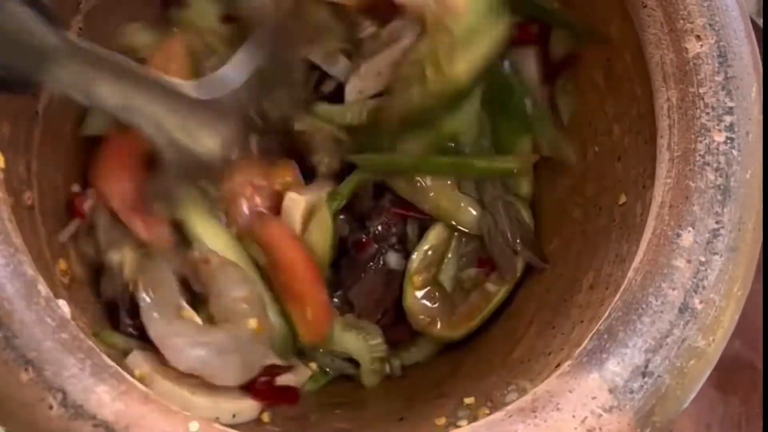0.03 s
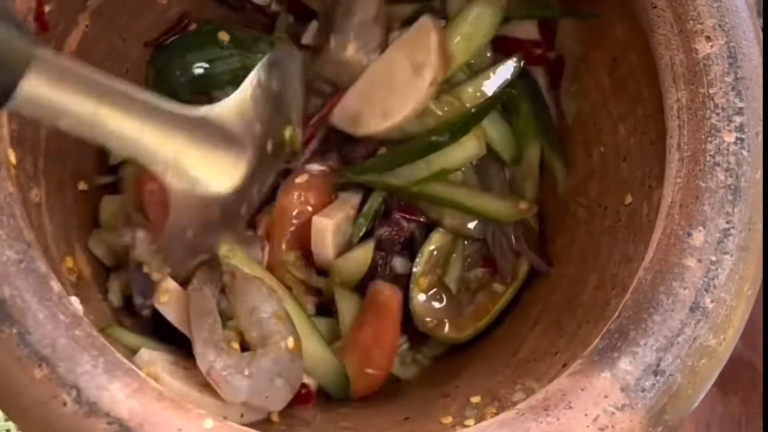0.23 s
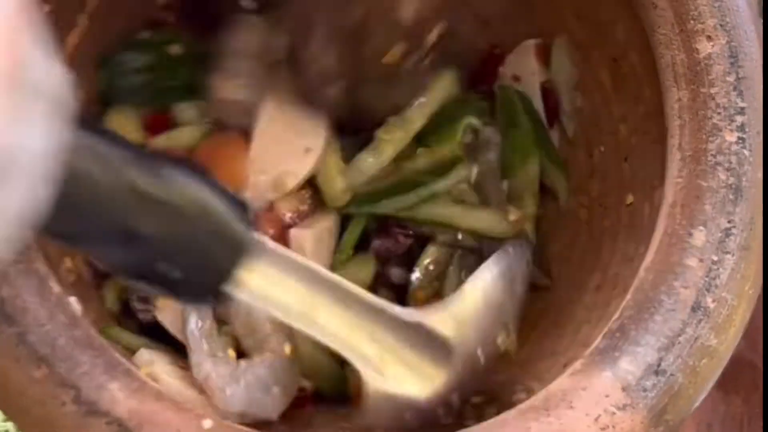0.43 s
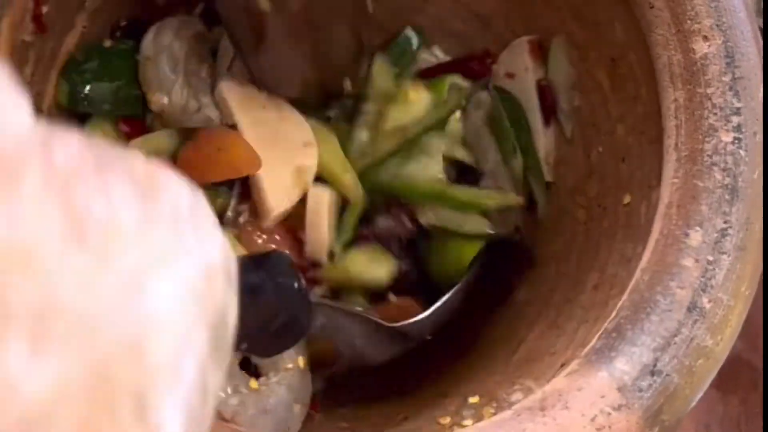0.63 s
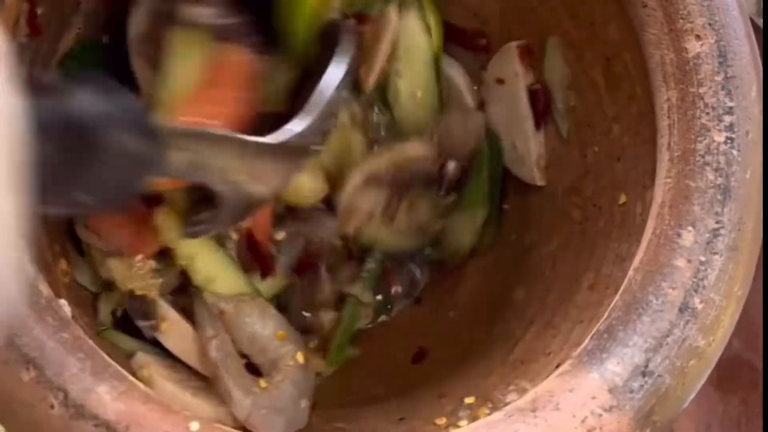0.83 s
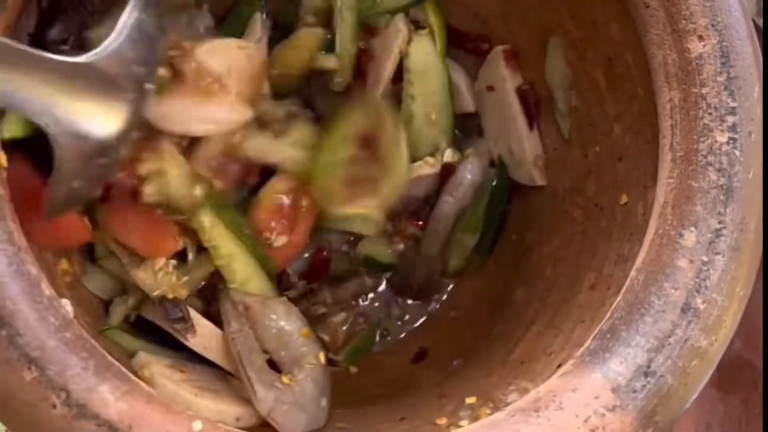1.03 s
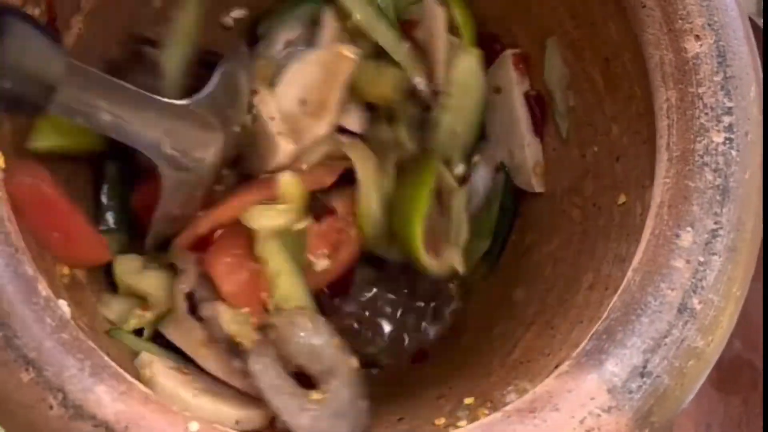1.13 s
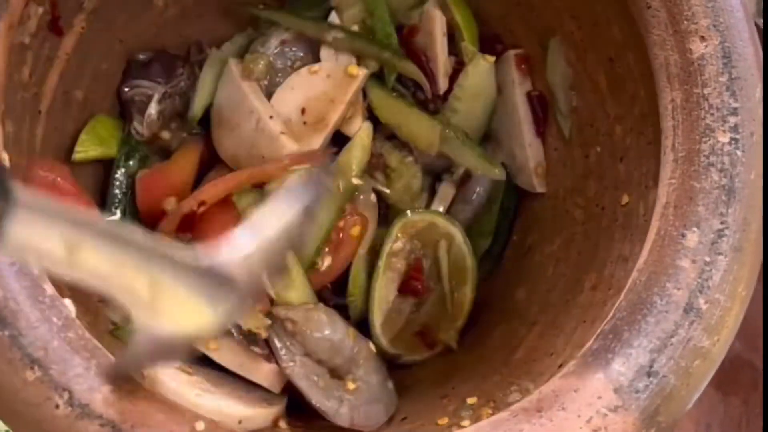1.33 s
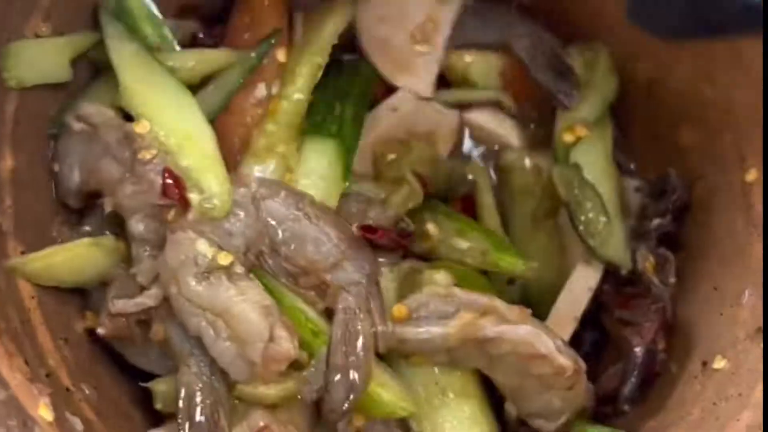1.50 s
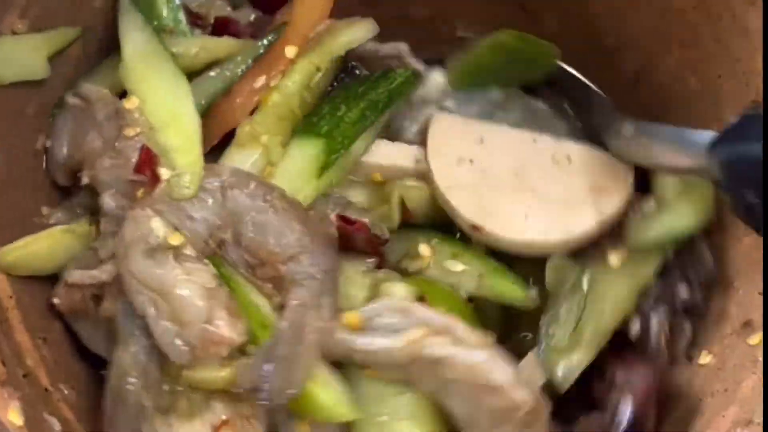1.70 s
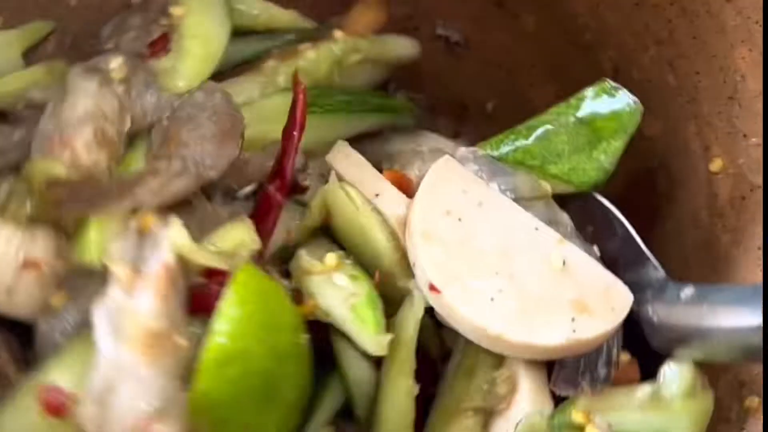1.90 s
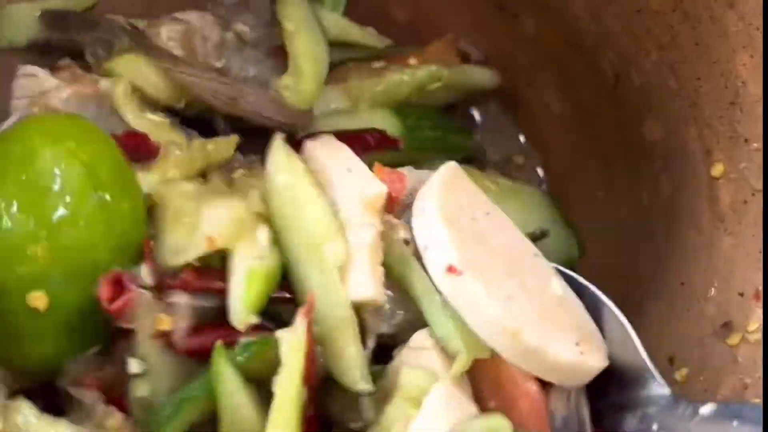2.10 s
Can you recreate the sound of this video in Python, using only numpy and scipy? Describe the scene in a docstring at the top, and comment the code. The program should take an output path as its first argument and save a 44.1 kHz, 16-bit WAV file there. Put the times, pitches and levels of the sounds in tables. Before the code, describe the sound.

A metal spoon turns wet salad in a clay mortar, close to the microphone. It scrapes and clinks against the wall amid small squelches and pops, then continues more quietly after a brief dip. A faint motor hums in the kitchen.

```python
"""Salad in a clay mortar

Close to the microphone, in a kitchen, a metal spoon turns a wet salad. It clinks against the clay
wall and scrapes along it, ringing the modes of both; wet pieces squelch, tick, crackle and plop.
Behind it a motor hums, with room noise and a low rumble. Near 1.5 s the sound fades out for a
moment and returns, quieter and from another position."""
import sys
import numpy as np
from scipy import signal
from scipy.fft import rfft, irfft
from scipy.io import wavfile

SR = 44100
rng = np.random.default_rng(int(sys.argv[2]) if len(sys.argv) > 2 else 0)


def inscribe(sig):
    """Save sig as 16-bit PCM at rate SR to the path in sys.argv[1].

    A 1-D sig is mono; a 2-D sig holds one channel per row.
    Samples are clipped to [-1, 1] before scaling.
    """
    pcm = np.round(np.clip(np.atleast_2d(sig).T, -1, 1) * 32767)
    wavfile.write(sys.argv[1], SR, pcm.astype(np.int16))


N = 94815
TIME = np.arange(N) / SR
BREAK_S = 1.478  # the position changes here, inside the fade
BEFORE = TIME < BREAK_S

# modes of spoon and mortar: f/Hz, t60/s, relative level/dB when struck at spot A, B, C
MODES = [(541, 0.044, -13.5, -28, -21), (1107, 0.091, -36.5, -38.5, -24), (1490, 0.1, -37, -35, -30.5),
         (1773, 0.036, -35.5, -9, -34), (2215, 0.09, -43, -50.5, -28), (2980, 0.019, -5, -29.5, -16),
         (3620, 0.033, -32, -13, -49), (4316, 0.076, -46.5, -24, -34.5), (5690, 0.074, -30, -21, -30.5),
         (6240, 0.02, -12.5, -16, -25.5), (7080, 0.015, -18.5, -13.5, -16), (7560, 0.21, -28, -25.5, -28),
         (8850, 0.066, -12.5, -17, -26.5), (9890, 0.12, -27.5, -43.5, -32), (11420, 0.044, -11.5, -15, -18),
         (13030, 0.025, 0, -15, -13)]
SPOT_DB = dict(zip("ABC", np.transpose(MODES)[2:]))
# strikes and rebounds: t/s, spot, ring/dB, ring length factor, crack/dB, crack t60/s, crack low-pass/Hz
CLINKS = [(0.3845, "A", 1, 0.69, -15, 0.052, 12000), (0.396, "A", -3, 0.48, -24, 0.03, 7000),
          (0.4781, "B", 4, 0.73, -13, 0.07, 11000), (.4830, "B", -12.5, 0.55, -16.5, 0.071, 9550),
          (1.3241, "C", 1.5, 1.03, -12, 0.02, 4950), (1.3502, "C", -6.5, 0.67, -25, 0.03, 9300)]
# bare spoon on the wall: t/s, length/s, spot, level/dB, level change/dB
SLIDES = [(1.355, .022, "C", -29, -6.5), (1.376, 0.086, "C", -42, -2)]
# spoon through salad and along clay: t/s, length/s, squelch/dB, squelch f/Hz, scrape/dB, level change/dB
STROKES = [(0, 0.063, -49.5, 1710, -42.5, -7), (0.062, 0.087, -39.5, 1500, -38, -7.5),
           (0.396, 0.015, -26.5, 2790, -29, -11), (0.409, 0.035, -52, 2650, -34.5, 1.5),
           (0.424, 0.051, -38.5, 1600, -36.5, 8.5), (0.506, 0.027, -39, 2310, -31, -0.5),
           (0.54, 0.044, -30.5, 1950, -29.5, -1.5), (0.588, 0.16, -47, 1490, -44.5, -4),
           (0.745, 0.15, -48.5, 2200, -42, -6.5), (0.929, 0.066, -43.5, 2100, -50.5, 0.5),
           (1.064, 0.091, -43.5, 1920, -39.5, -1.5), (1.162, 0.053, -44.5, 1610, -49.5, -6.5),
           (1.344, 0.035, -38, 2370, -36, -2), (1.559, 0.052, -43, 2760, -44, -4),
           (1.618, 0.032, -45, 2490, -43.5, 1), (1.648, 0.12, -75, 2220, -48.5, -7),
           (1.786, 0.04, -41, 1770, -34, -7), (1.834, 0.096, -58, 1800, -53, 0),
           (1.922, 0.024, -38, 2560, -46, -1)]
# spectrum of the scrape: f/Hz, relative density/dB
SCRAPE_SPECTRUM = [(150, -17), (500, 1.5), (900, 1.5), (2500, -0.5), (4000, 3.5), (4800, 0), (7500, 1),
                   (11000, 1), (15000, -2.5), (16500, -44.5)]
# singing spoon edge: t/s, length/s, f/Hz, level/dB
SQUEALS = [(0.432, 0.03, 11670, -24.5), (0.908, 0.08, 1152, -41.5), (1.786, 0.034, 4930, -33)]
# wet pieces parting: t/s, level/dB, centre f/Hz
TICKS = [(0.092, -28.5, 7300), (0.2114, -27, 6900), (0.221, -20.5, 9800), (0.2882, -29, 7900),
         (.319, -24.5, 7600), (.327, -24, 10100), (0.4673, -16.5, 2900), (0.5564, -18, 6800),
         (0.7436, -25.5, 7000), (0.7982, -16, 11500), (.862, -26.5, 8700), (0.9148, -26.5, 10800),
         (0.992, -29.5, 11200), (1.171, -29, 11000), (1.2511, -27.5, 7600), (1.264, -33, 6540),
         (1.2805, -28.5, 9050), (1.789, -28, 8000), (1.9062, -28.5, 10200), (1.9705, -34.5, 9800)]
# fine crackle of the dressing: t/s, level/dB
CRACKLE_LEVEL = [(.9, -45), (1.3, -49), (1.52, -68), (1.75, -49), (2.1, -60)]
# bursting air pockets, then soft pieces hitting the mortar: t/s, level/dB, starting f/Hz, t60/s
POPS = [(0.084, -17, 1560, 0.011), (0.544, -16, 2500, 0.022), (.753, -25.5, 3040, 0.01),
        (0.795, -22.5, 1620, 0.0089), (0.8066, -22, 2620, 0.0081), (.817, -27.5, 2300, 0.025),
        (.931, -27.5, 2670, 0.018), (.953, -27, 2410, 0.025), (0.999, -24.5, 2200, 0.016),
        (1.04, -32, 2280, 0.021), (1.129, -30.5, 2680, 0.017), (1.651, -31.5, 1785, 0.061),
        (1.8262, -25, 1670, 0.012), (1.9717, -28.5, 1850, 0.0068)]
KNOCKS = [(0.2202, -20.5, 582, 0.042), (0.3597, -22.5, 574, 0.033), (0.4723, -2.5, 850, 0.0067),
          (0.481, -32.5, 172.4, 0.098), (0.822, -23, 710, 0.019), (0.8588, -27.5, 490, .03),
          (0.9239, -30, 565, 0.041), (1.3252, -21, 380, 0.019), (1.79, -22.5, 964, 0.018),
          (1.908, -35, 696, 0.02), (2.032, -36, 892, 0.04)]
# decay of the kitchen: f/Hz, t60/s
ROOM_T60 = [(1000, 0.16), (16000, 0.03)]
# motor lines before and after the break: f/Hz, relative level/dB
HUM_BEFORE = [(49, -51), (75, -50.5), (92, -51.5), (148, -69.5), (245, -57), (347, -61)]
HUM_AFTER = [(80, -50.5), (151, -59.5)]
# spectra of the room noise in each position and of the rumble: f/Hz, relative density/dB
AIR_BEFORE = [(20, -29), (60, -38.5), (130, -6), (300, -0.5), (700, -12.5), (2000, -18), (5000, -24),
              (14000, -23)]
AIR_AFTER = [(20, -21), (50, -25.5), (80, -8.5), (150, 0), (300, -6.5), (750, -8), (1250, -14.5),
             (2500, -10), (6000, -14), (14000, -17.5)]
RUMBLE_SPECTRUM = [(20, -44), (36, -37.5), (47, -3), (90, -3.5), (115, -11.5), (150, -5), (200, -19.5),
                   (600, -55), (2000, -92)]
# envelopes of hum, room noise, rumble and the overall fade: t/s, gain/dB
HUM_GAIN = [(.8, 6), (.95, 0.5), (1.35, 4), (1.42, -19), (1.53, -23), (1.63, 0), (2.02, -1.5), (2.15, -5)]
AIR_GAIN = [(0, -43), (.4, -41.5), (.85, -41), (.93, -49), (1.3, -48.5), (1.45, -59), (1.62, -50),
            (1.95, -49.5), (2.15, -50.5)]
RUMBLE_GAIN = [(0, -37), (.33, -39.5), (.41, -36), (.66, -40), (.86, -39.5), (.91, -54), (1.11, -47),
               (1.25, -61), (1.34, -36), (1.41, -69)]
FADE = [(1.44, -2.5), (1.455, -13), (1.467, -40.5), (1.485, -41), (1.50, -13), (1.525, 2), (1.56, -1.5)]
# lead of the left channel in each position: f/Hz, phase/rad
PHASE_BEFORE = [(0, 0), (4300, -.1), (4900, -1.6), (5300, -5.7), (5900, -6.25), (7400, -6.3), (13200, -9.4),
                (16500, -9.45)]
PHASE_AFTER = [(0, 0), (1200, -.2), (1800, .6), (2600, 0), (6500, -.5), (7300, -2.2), (8000, -6),
               (11400, -6.3), (12300, -6.9), (16000, -7.9)]


def clinks(rise_s=0.0013):
    """Metal meets clay: a gritty crack and a ring that the food damps quickly."""
    out, t = np.zeros(N), TIME[:SR // 4]
    for s, spot, ring_db, longer, crack_db, t60, dull_hz in CLINKS:
        pole = np.exp(-2 * np.pi * dull_hz / SR)
        dulled = signal.lfilter([1], [1, -pole], rng.standard_normal(len(t)))
        crack = amp(crack_db - 60 * t / t60) * unit(band(dulled, hz=2200, q=0.24))
        blow = amp(ring_db) * ring(SPOT_DB[spot], longer) + crack
        add(out, s, np.minimum(t / rise_s, 1) * blow)
    return out


def ring(levels_db, longer=1):
    """The dying modes of spoon and mortar, unsteady because the two stay in contact."""
    t = TIME[:SR // 4]
    return sum(amp(db - 60 * t / (t60 * longer)) * tone(hz * t, rough=0.41, rate_hz=76)
               for (hz, t60, *_), db in zip(MODES, levels_db))


def slides():
    """Friction feeds the modes of the spot that was just struck."""
    out = np.zeros(N)
    for start, length, spot, db, change_db in SLIDES:
        shape = contact(length, change_db)
        singing = unit(signal.fftconvolve(rng.standard_normal(N), ring(SPOT_DB[spot]), "valid"))
        add(out, start, amp(db) * shape * singing[:len(shape)])
    return out


def strokes(catch_db=3, ring_db=-7.5):
    """Tiny slips on rough clay hiss and ring the spoon; the wet leaves squelch in a broad resonance."""
    squelch, pressure = np.zeros(N), np.zeros(N)
    for start, length, squelch_db, hz, scrape_db, change_db in STROKES:
        shape = contact(length, change_db)
        wet = unit(band(grains(N // 4, per_s=3500, spread_db=3), hz, q=1.6, order=2))
        add(squelch, start, amp(squelch_db) * shape * wet[:len(shape)])
        add(pressure, start, amp(scrape_db) * shape)
    catching = amp(catch_db * wander(N, rate_hz=104).real)  # the spoon catches and slides unevenly
    slips = catching * pressure * colour(grains(N, per_s=9000, spread_db=2), SCRAPE_SPECTRUM)
    body = ring(np.mean(list(SPOT_DB.values()), axis=0))
    ringing = signal.fftconvolve(slips, body / np.linalg.norm(body))[:N]
    return catching * squelch + slips + amp(ring_db) * ringing


def contact(length, change_db, rise_s=0.0051, release_s=0.005):
    """The spoon bears down, eases off or presses harder, and lifts."""
    t = np.arange(0, length + 6 * release_s, 1 / SR)
    lift = np.exp(-np.maximum(t - length, 0) / release_s)
    return np.minimum(t / rise_s, 1) * amp(change_db * t / length) * lift


def squeals():
    """The edge of the spoon sticks and slips, so one rough note swells and fades."""
    out, t = np.zeros(N), TIME[:SR // 8]
    for s, length, hz, db in SQUEALS:
        swell = np.sin(np.pi * np.minimum(t / length, 1))
        add(out, s, amp(db) * swell * tone(hz * t, rough=1.6, rate_hz=hz * 0.032))
    return out


def ticks(rise_s=0.00037, t60=0.011, burst_s=0.0016):
    """Films of dressing snap: a few clear ticks over a fine crackle."""
    out, t = np.zeros(N), TIME[:SR // 20]
    for s, db, hz in TICKS:
        snap = unit(band(rng.standard_normal(len(t)), hz, q=1.2))
        add(out, s, amp(db - 60 * t / t60) * np.minimum(t / rise_s, 1) * snap)
    burst = rng.standard_normal(len(t)) * np.exp(-t / burst_s)
    bursts = signal.fftconvolve(grains(N, per_s=180, spread_db=3.5), burst)[:N]
    return out + unit(band(bursts, hz=8500, q=0.47)) * envelope(CRACKLE_LEVEL)


def plops(rise_s=0.00047, sag=0.15, sag_s=0.0027):
    """Air pockets in the dressing pop; soft pieces knock on the clay, duller and sagging in pitch."""
    out, t = np.zeros(N), TIME[:SR // 12]
    rise = np.minimum(t / rise_s, 1)
    pitch = 1 - sag * (1 - np.exp(-t / sag_s))
    for s, db, hz, t60 in POPS:
        add(out, s, rise * amp(db - 60 * t / t60) * tone(hz * t, rough=0.7, rate_hz=600))
    for s, db, hz, t60 in KNOCKS:
        turns = np.cumsum(hz * pitch) / SR
        add(out, s, rise * amp(db - 60 * t / t60) * tone(turns, rough=0.6, rate_hz=200))
    return out


def room(x):
    """The kitchen answers with a short diffuse tail, different in each channel."""
    hz, t, noise = signal.stft(rng.standard_normal((2, SR // 3)), SR, nperseg=256)
    decay = amp(-60 * t / spectrum(ROOM_T60, hz)[:, None])
    tail = signal.istft(noise * decay, SR, nperseg=256)[1]
    return signal.fftconvolve(x[None], tail / np.linalg.norm(tail[0]), axes=1)[:, :N]


def air():
    """Room noise in each position, nearly the same in both channels."""
    noise = rng.standard_normal(N) + amp(-14.5) * rng.standard_normal((2, N))
    return np.where(BEFORE, colour(noise, AIR_BEFORE), colour(noise, AIR_AFTER)) * envelope(AIR_GAIN)


def motor():
    """A motor hums in the background: low lines that waver in level and phase."""
    before = sum(amp(db) * unit(tone(hz * TIME, rough=0.97, rate_hz=5.6)) for hz, db in HUM_BEFORE)
    after = sum(amp(db) * unit(tone(hz * TIME, rough=1, rate_hz=5.6)) for hz, db in HUM_AFTER)
    return np.where(BEFORE, before, after) * envelope(HUM_GAIN)


def rumble():
    """Low noise, probably from handling, that all but stops at the break."""
    return colour(rng.standard_normal(N), RUMBLE_SPECTRUM) * envelope(RUMBLE_GAIN)


def tone(turns, rough, rate_hz):
    """A sine of the given running phase that wavers in level and pitch."""
    carrier = np.exp(2j * np.pi * (turns + rng.random()))
    return ((1 + rough * wander(len(turns), rate_hz)) * carrier).real / np.sqrt(1 + rough ** 2)


def wander(size, rate_hz):
    """Smooth complex random drift, rms 1."""
    slow = np.exp(-(np.fft.fftfreq(size, 1 / SR) / rate_hz) ** 2)
    drift = np.fft.ifft(slow * np.exp(2j * np.pi * rng.random(size)))
    return drift / np.sqrt(np.mean(abs(drift) ** 2))


def grains(size, per_s, spread_db):
    """Random tiny impulses of uneven strength."""
    occurs = rng.random(size) < per_s / SR
    sign = rng.choice([-1, 1], size)
    return occurs * sign * amp(spread_db * np.minimum(rng.exponential(1, size), 4))


def band(x, hz, q, order=1):
    """Band-pass around a centre."""
    ratio = np.exp(0.5 / q)
    edges = [min(hz / ratio, SR / 3), min(hz * ratio, SR / 2 - 500)]
    return signal.sosfilt(signal.butter(order, edges, "band", fs=SR, output="sos"), x)


def colour(x, points):
    """Gives a long signal a spectrum, at rms 1."""
    return unit(irfft(rfft(x) * amp(spectrum(points, np.fft.rfftfreq(N, 1 / SR))), N))


def spectrum(points, hz):
    """Reads a table on a log-frequency axis."""
    f, value = np.transpose(points)
    return np.interp(np.log(hz + 1), np.log(f + 1), value)


def envelope(points):
    """Gain at each sample from points of t/s, gain/dB."""
    return amp(np.interp(TIME, *np.transpose(points)))


def amp(db):
    """Decibels to gain."""
    return 10 ** (np.asarray(db) / 20)


def unit(x):
    """Scales to rms 1."""
    return x / np.sqrt(np.mean(x ** 2) + 1e-20)


def add(mix, s, sound):
    """Mixes a sound in at a time."""
    part = mix[max(round(s * SR), 0):][:len(sound)]
    part += sound[:len(part)]


def scene():
    """The mortar close to the microphone, its room tail and the kitchen behind it."""
    mortar = clinks() + slides() + strokes() + squeals() + ticks() + plops()
    return mortar + amp(-14) * room(mortar) + air() + motor() + rumble()


def record(dry):
    """The stereo microphone: channel phase in each position, the fade between them, a band limit."""
    hz, left = np.fft.rfftfreq(2 * N, 1 / SR), rfft(dry[0], 2 * N)
    leads = (np.interp(hz, *np.transpose(points)) for points in (PHASE_BEFORE, PHASE_AFTER))
    before, after = (irfft(left * np.exp(1j * lead))[:N] for lead in leads)
    pair = np.array([np.where(BEFORE, before, after), dry[1]]) * envelope(FADE)
    low_pass = signal.firwin(255, cutoff=16300, window=("kaiser", 9), fs=SR)
    return signal.oaconvolve(pair, low_pass[None], "same")


dry = scene()
out = record(dry)
inscribe(out)
```